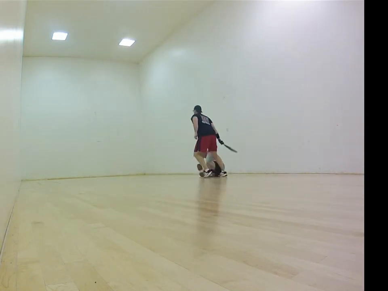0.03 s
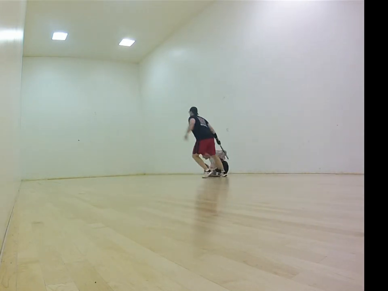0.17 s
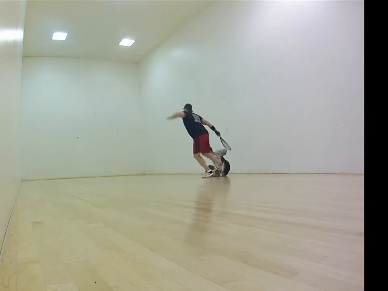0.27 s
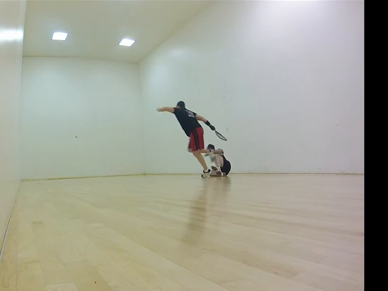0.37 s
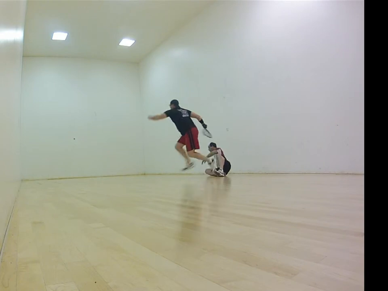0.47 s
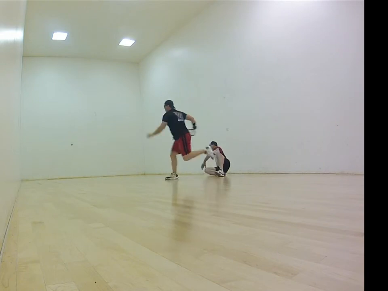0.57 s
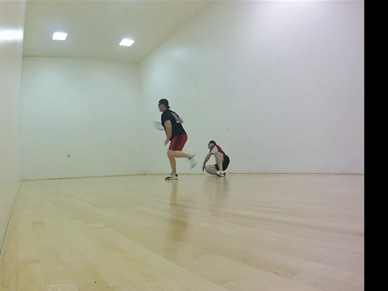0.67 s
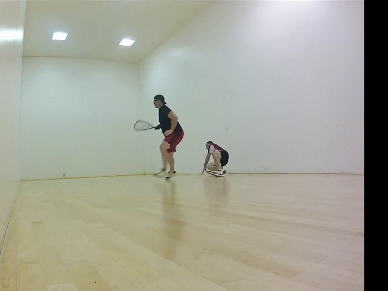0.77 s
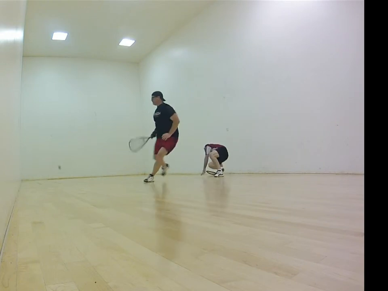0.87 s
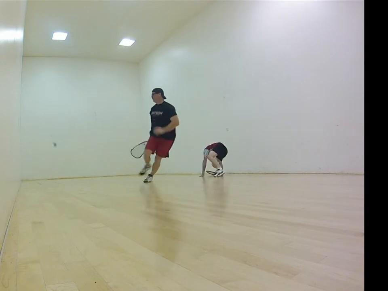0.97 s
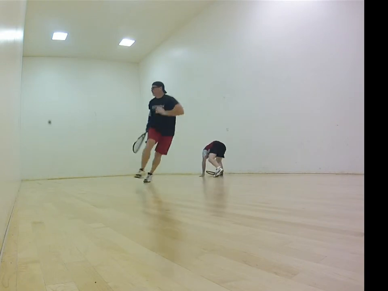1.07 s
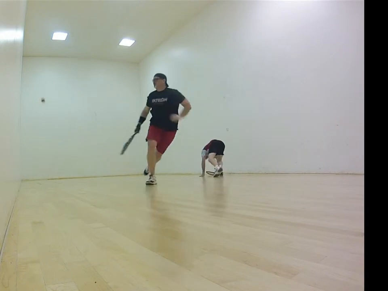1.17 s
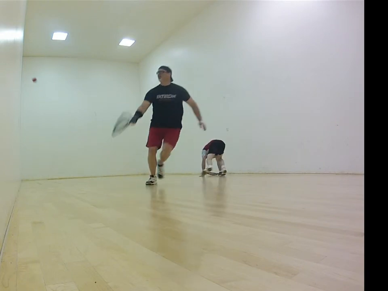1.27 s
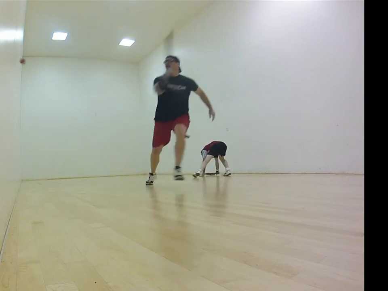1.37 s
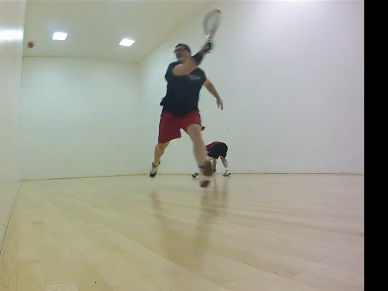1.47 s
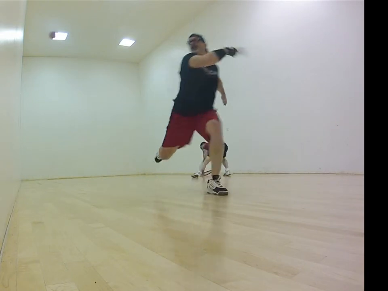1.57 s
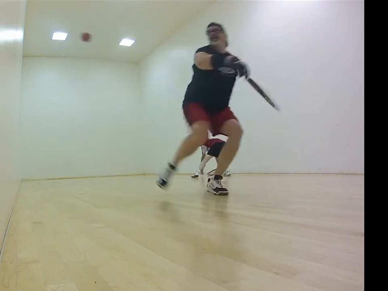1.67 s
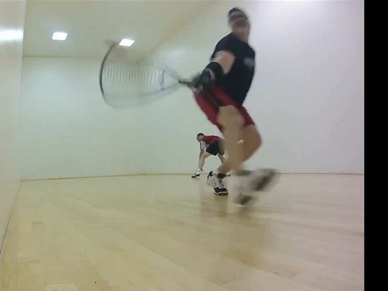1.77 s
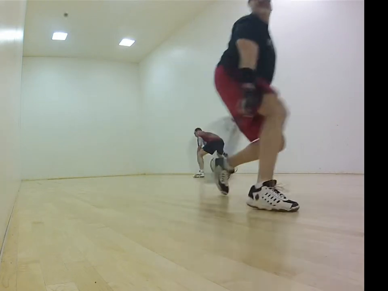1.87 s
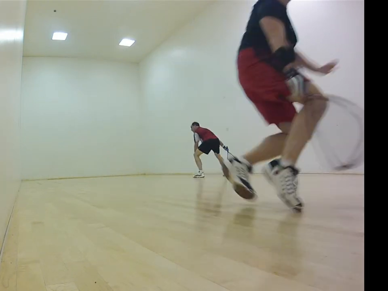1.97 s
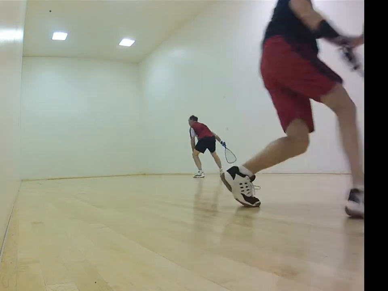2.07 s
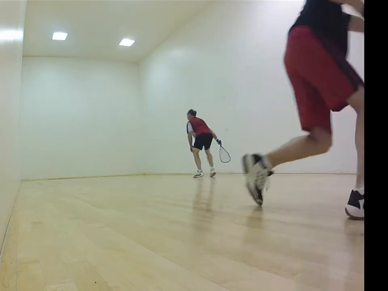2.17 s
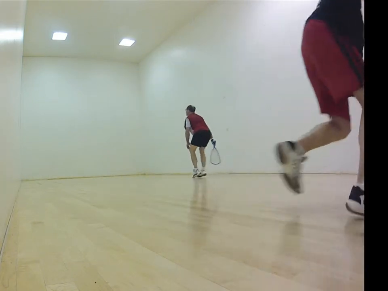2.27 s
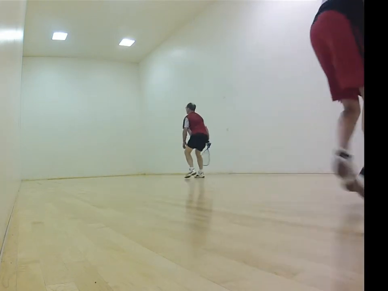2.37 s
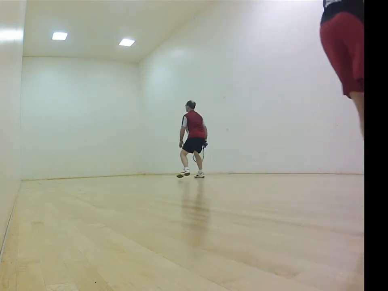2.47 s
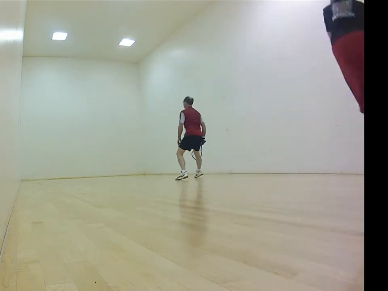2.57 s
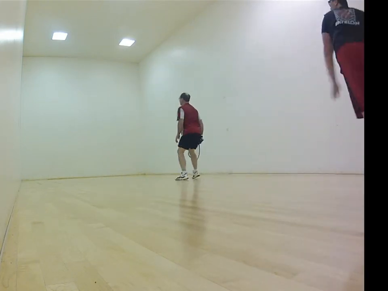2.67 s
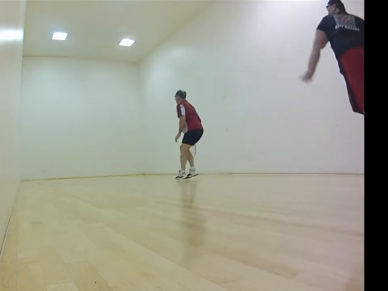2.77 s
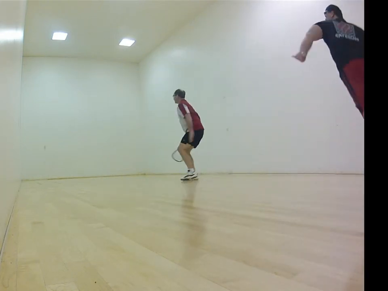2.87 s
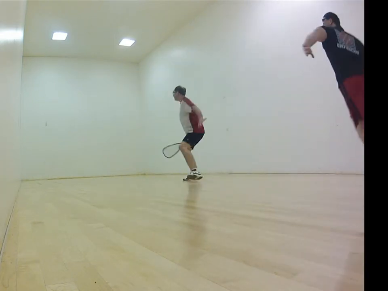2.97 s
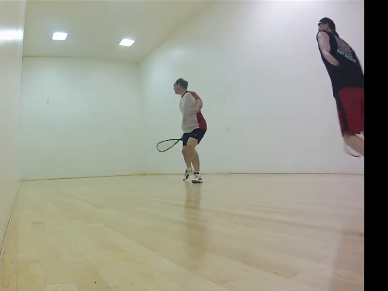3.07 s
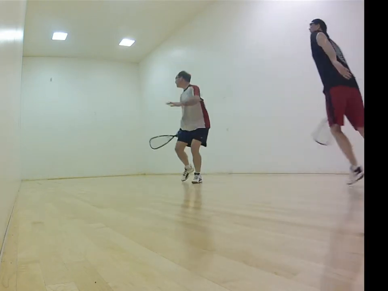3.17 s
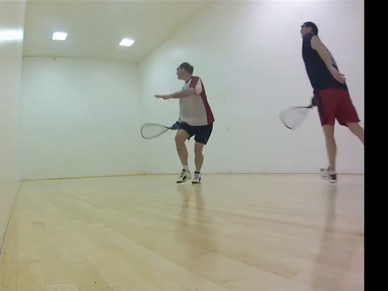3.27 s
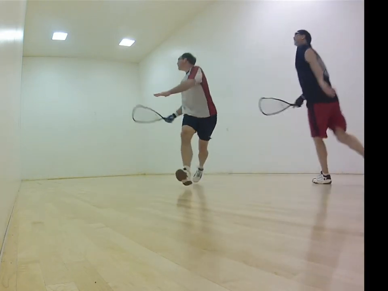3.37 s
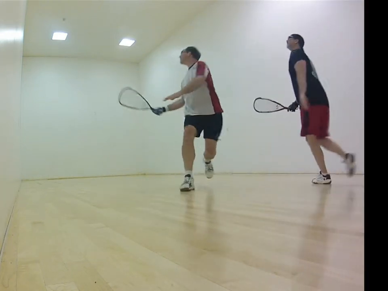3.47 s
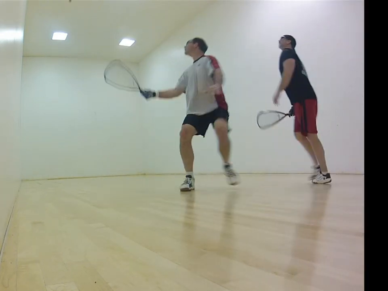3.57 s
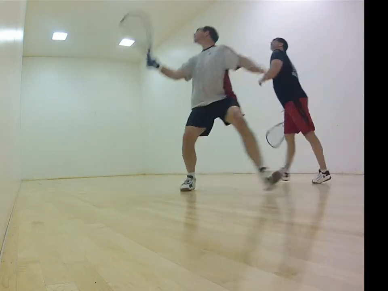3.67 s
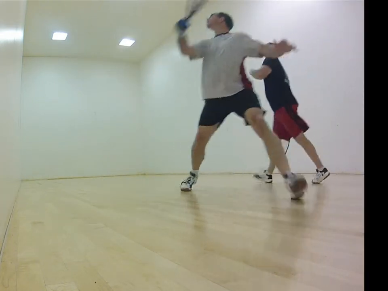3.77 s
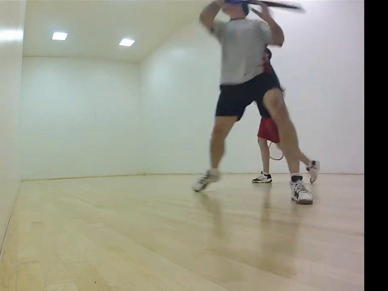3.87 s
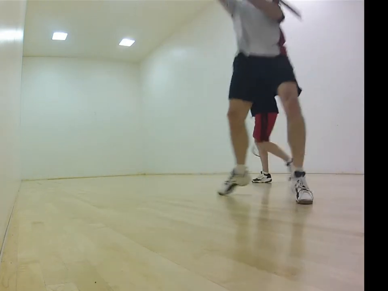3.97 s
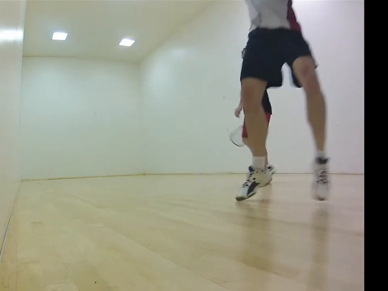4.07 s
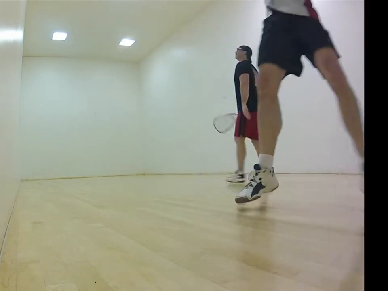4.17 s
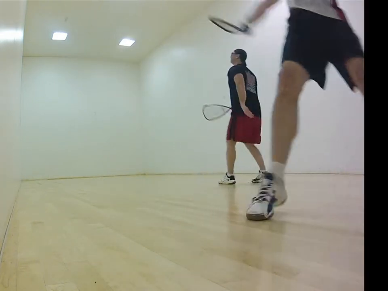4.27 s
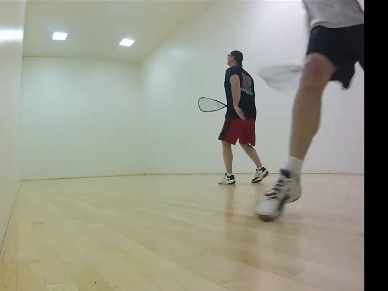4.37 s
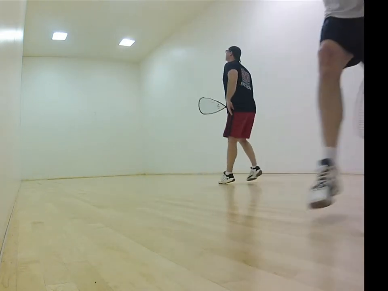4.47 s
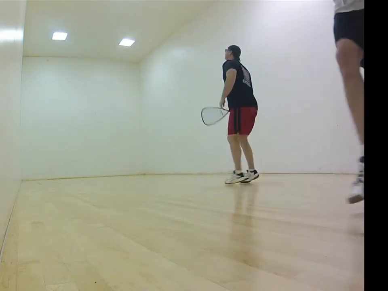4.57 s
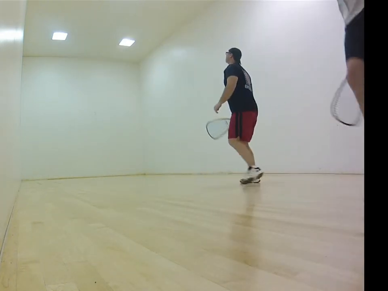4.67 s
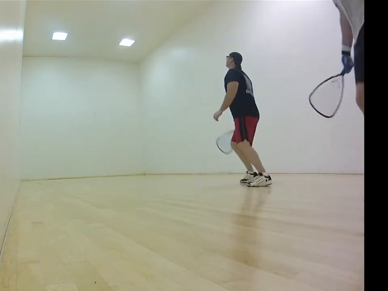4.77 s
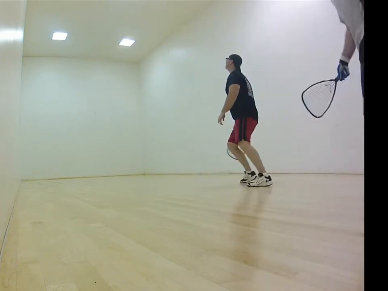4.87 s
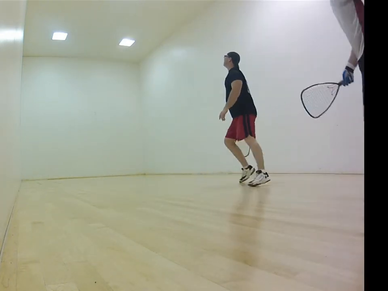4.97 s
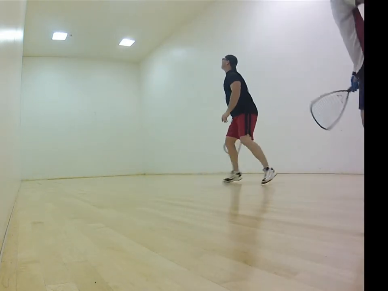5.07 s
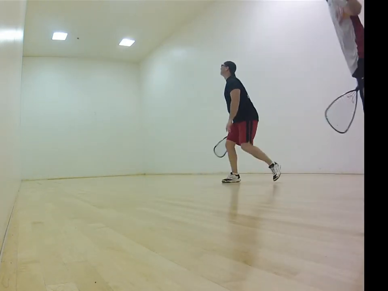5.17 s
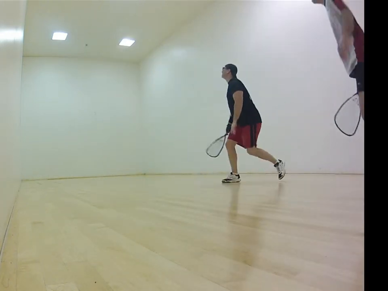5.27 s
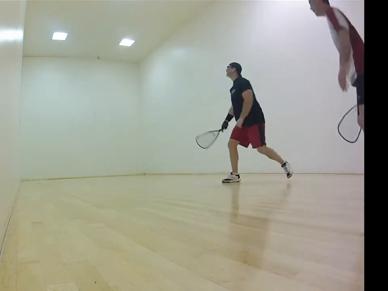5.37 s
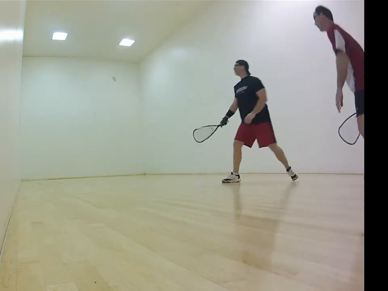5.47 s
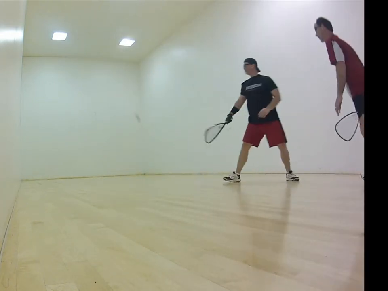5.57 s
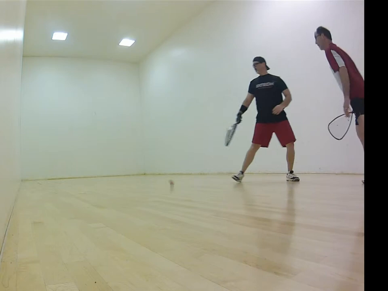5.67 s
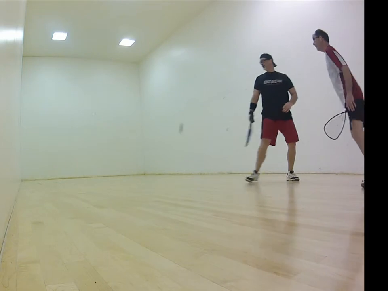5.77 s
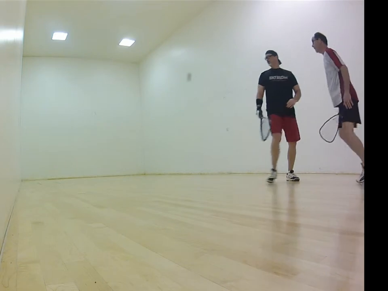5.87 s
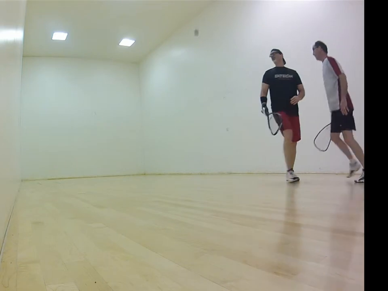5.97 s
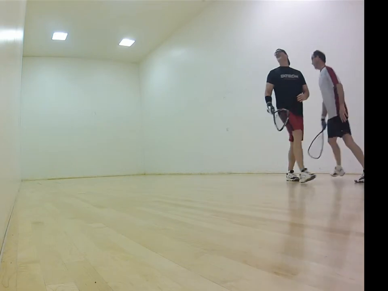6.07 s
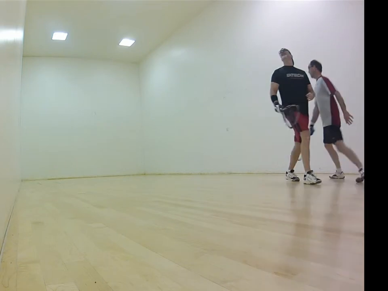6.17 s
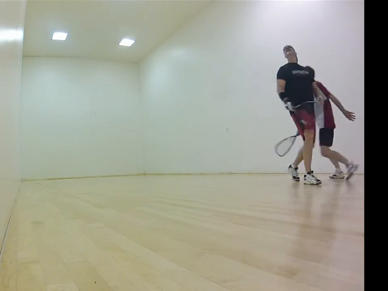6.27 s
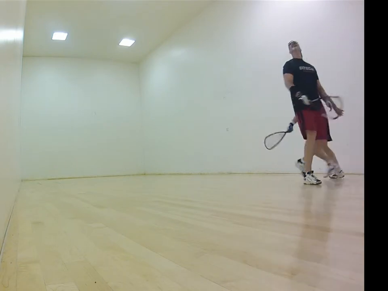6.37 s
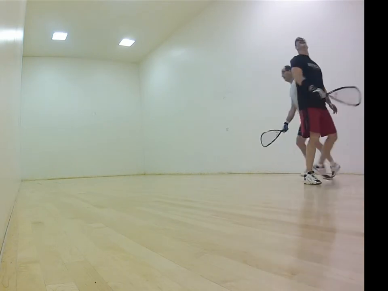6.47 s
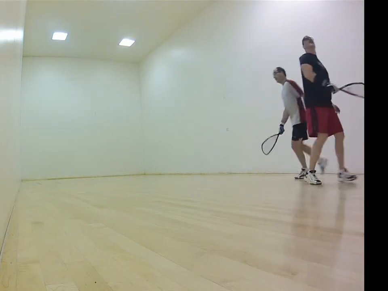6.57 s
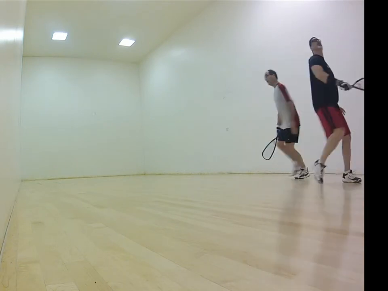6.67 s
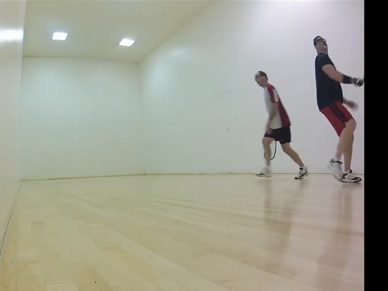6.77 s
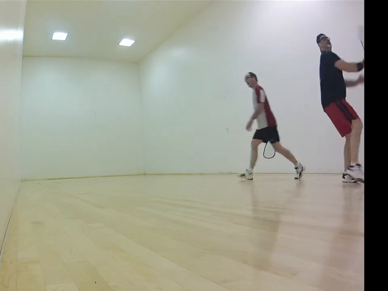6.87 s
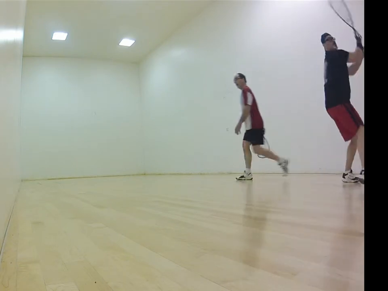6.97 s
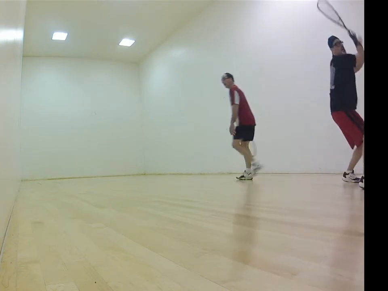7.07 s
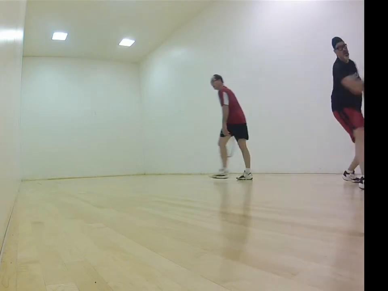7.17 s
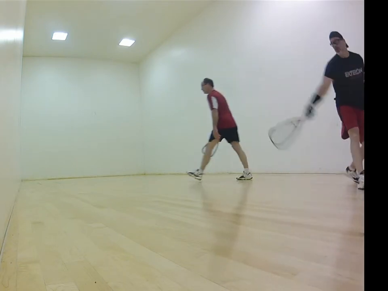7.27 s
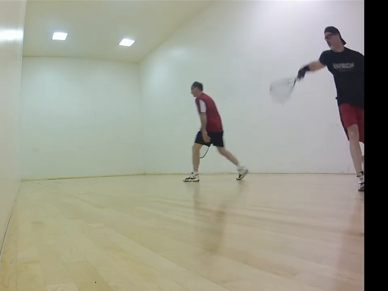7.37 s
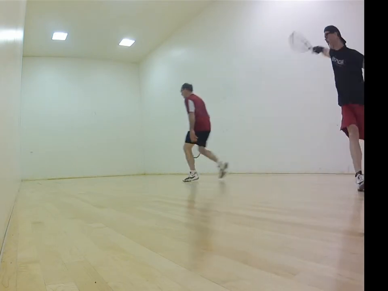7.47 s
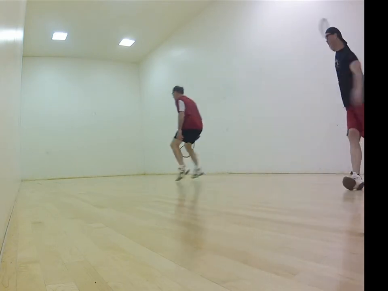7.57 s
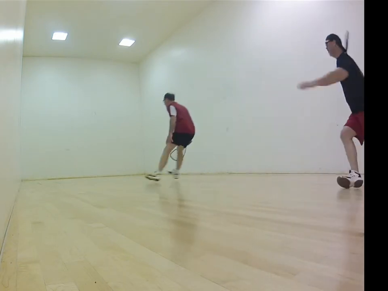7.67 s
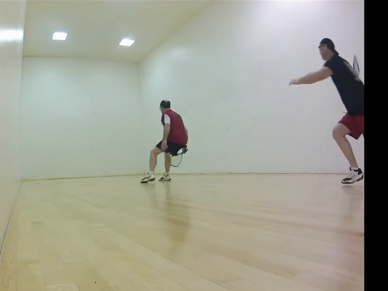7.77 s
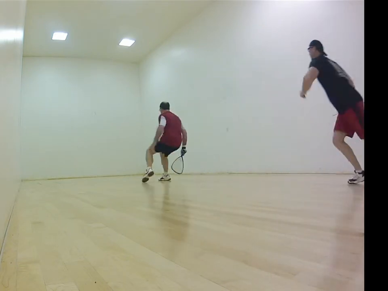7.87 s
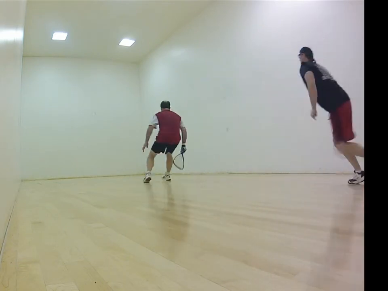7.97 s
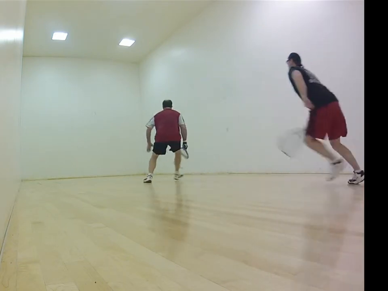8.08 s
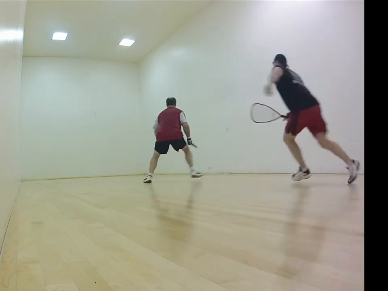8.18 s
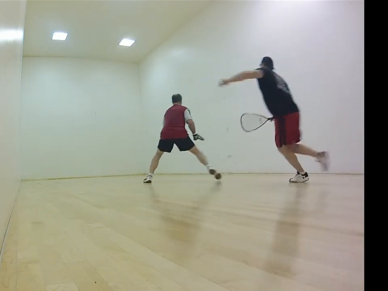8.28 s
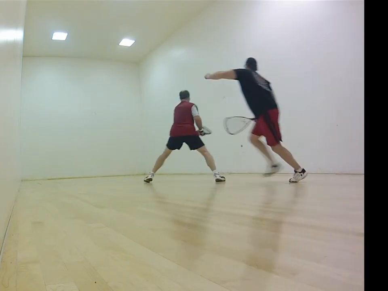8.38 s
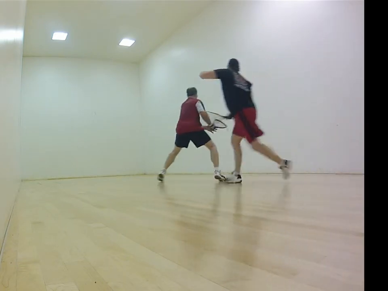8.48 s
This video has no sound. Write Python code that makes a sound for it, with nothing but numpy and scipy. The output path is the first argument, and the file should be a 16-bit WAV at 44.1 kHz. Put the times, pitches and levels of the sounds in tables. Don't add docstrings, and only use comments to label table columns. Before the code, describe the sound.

Hollow rubber ball cracks off racquets, walls and floor in a hard, echoing indoor court, with shoe squeaks and booming footfalls.

```python
import sys
import numpy as np
from scipy import signal
from scipy.fft import rfft, irfft, next_fast_len
from scipy.io import wavfile

SR = 44100
rng = np.random.default_rng(int(sys.argv[2]) if len(sys.argv) > 2 else 0)


def gain_from_db(level_db):
    decades = np.asarray(level_db, float) / 20
    return 10 ** decades


def to_wav(sig):
    pcm = np.clip(np.atleast_2d(sig), -1, 1) * 32767
    pcm = np.round(pcm).astype(np.int16)
    wavfile.write(sys.argv[1], SR, pcm.T)


N = 376605
RUN_IN = SR


def at_hz(points, hz):
    table = np.array(points)
    return np.interp(np.log(hz), np.log(table[:, 0]), table[:, 1])


def burst(hz, length_s, glide, rise):
    u = np.arange(1, int(length_s * SR)) / (length_s * SR)
    hump = np.sin(np.pi * u ** rise) ** 2
    phase = 2 * np.pi * hz * length_s * (u + glide * (u * u - u))
    tone = hump * np.sin(phase)
    return tone / np.linalg.norm(tone)


def silent_tracks():
    return np.zeros((2, N + 2 * RUN_IN))


def add(tracks, start_s, pulse, level_db, nearness_db):
    i = RUN_IN + int(start_s * SR)
    path_gains = np.array([[1], [gain_from_db(nearness_db + 10.5)]])
    tracks[:, i:i + len(pulse)] += pulse * gain_from_db(level_db) * path_gains


# start_s [s], thud_db [dB], ring_db [dB], ring_hz [Hz], nearness_db [dB]
STROKES = [
    (-.3, 7, 6, 788, 0),
    (.124, 1.5, -2.5, 798, 25),
    (1.638, -15.5, -29, 690, 28),
    (2.0, -9, -10.5, 967, 14.5),
    (2.1729, 0, -6, 880, 18),
    (4.183, -4.5, 2, 830, 21),
    (4.706, -4.5, -11, 827, 27),
    (7.329, -5.5, -1, 829, 27),
    (7.874, -8.5, -36, 870, 19),
]
# start_s [s], thud_db [dB], ring_db [dB], ring_hz [Hz], nearness_db [dB]
WALLS = [
    (2.10, -5.5, -7, 733, 19.5),
    (2.88, -14.5, -15, 885, 25),
    (5.211, -27, -36, 810, 35.5),
    (5.296, -17, -26, 791, 26),
    (5.789, -14.5, -9, 906.4, 33),
    (7.316, -35.5, -38, 650, 40),
    (7.56, -13.5, -12.5, 810, 25),
    (7.697, -1, -3.5, 814, 19),
    (7.769, -6.5, -3.5, 871.5, 22.5),
]
# start_s [s], thud_db [dB],
# ring_db [dB], ring_hz [Hz], nearness_db [dB]
GLANCES = [
    (4.728, -50, 4, 847.6, 20),
    (6.09, -55, -25.5, 893, 31),
    (7.392, -12, -2.5, 907, 20),
    (7.61, -14, -25, 800, 23.5),
    (8.06, -15, -9, 880, 15),
    (8.43, -22, -12, 796, 19),
]
# start_s [s], thud_db [dB], ring_db [dB], ring_hz [Hz], nearness_db [dB]
BOUNCES = [
    (.662, 0, -1.5, 670, 24.5),
    (1.856, -7.5, -9, 745, 28),
    (1.914, -8.5, -18.5, 907, 31.5),
    (3.869, -28.5, -39, 662, 31),
    (3.908, -12.5, -21.5, 550, 35),
]


def ball():
    contact_s, ring_s, after_ring_s = 0.00241, 0.0096, 0.04
    after_ring_db, away_db = -2, -6
    crack_s = 0.0014
    tracks = silent_tracks()

    noise = rng.standard_normal((31, 600)) * np.exp(-np.arange(600) / (crack_s * SR))
    rubber_band = signal.butter(2, [1200, 6000], "band", fs=SR, output="sos")
    slaps = iter(signal.sosfilt(rubber_band, noise))
    squash = burst(257.3, 0.0058, -0.42, 0.77)
    bounce = -burst(170, 0.0106, -0.38, 0.8)
    # blows, thud pulse, crack re thud [dB], loss of after-ring to the floor [dB]
    kinds = ((STROKES, squash, -14, 0), (WALLS, squash, -27, 0),
             (GLANCES, squash, -6, 0), (BOUNCES, bounce, -24.5, -10.5))
    for blows, thud, crack_db, damping_db in kinds:
        for (start_s, thud_db, ring_db, ring_hz, nearness_db), slap in zip(blows, slaps):
            release_s = start_s + contact_s
            air_ring = burst(ring_hz, ring_s, 0.24, 0.86)
            shell_ring = burst(0.681 * ring_hz, 0.013, 0.087, 1.0)
            after_ring = burst(ring_hz, after_ring_s, 0, 0.39)
            add(tracks, start_s, thud, thud_db, nearness_db)
            add(tracks, release_s, air_ring, ring_db, nearness_db)
            add(tracks, release_s, shell_ring, ring_db - 10, nearness_db)
            add(tracks, release_s, after_ring, ring_db + after_ring_db + damping_db, nearness_db + away_db)
            add(tracks, start_s + 0.002, slap / np.linalg.norm(slap), thud_db + crack_db, nearness_db)
    return tracks


# pitch_hz [Hz], level_db [dB]
EARLIER_SCUFFS = [
    (1200, -16),
    (4600, -14),
]
# start_s [s], pitch_hz [Hz], level_db [dB], length_s [s], nearness_db [dB]
SQUEAKS = [(.172, 1990, -24.5, 0.013, 30), (.245, 3150, -35, 0.0072, 46), (.748, 1300, -31, 0.0086, 16),
           (1.43, 2650, -29.5, 0.0029, 19), (2.176, 3196, -18.5, 0.0044, 34),
           (2.18, 4120, -17, 0.0043, 32.5), (2.18, 2490, -25, 0.012, 39), (4.32, 4180, -29, 0.0086, 32.5),
           (5.199, 2990, -24.5, 0.0047, 18), (6.71, 3910, -25.5, 0.0057, 21),
           (6.711, 2630, -33, 0.0047, 21), (6.712, 5070, -40, 0.0055, 17), (6.96, 1570, -40, 0.01, 12.5),
           (7.312, 4860, -52.5, .008, 39.5), (7.585, 2950, -28, 0.016, 24), (7.73, 4220, -33, 0.014, 24)]
# start_s [s], pitch_hz [Hz], level_db [dB], nearness_db [dB]
SCUFFS = [
    (.143, 2980, -16, 21.5),
    (.2, 1030, -16.5, 10),
    (.661, 1010, -23.5, 15),
    (1.429, 5000, -30.5, 18),
    (4.707, 3050, -24.5, 23),
    (4.735, 1680, -21, 7),
    (5.198, 5150, -32.5, 19),
    (5.791, 4030, -29, 25),
    (7.315, 3700, -43, 27),
]
# start_s [s], length_s [s], centre_hz [Hz], level_db [dB], nearness_db [dB]
DRAGS = [
    (0.153, 0.17, 3720, -13.5, 31),
    (7.293, 0.087, 4330, -36, 34),
    (7.464, 0.015, 2890, -25.5, 28.5),
    (7.56, 0.044, 4900, -28.5, 32),
]


def squeaks():
    scuff_s, glide = 0.0016, 0.025
    drag_width = 1.29
    tracks = silent_tracks()
    add(tracks, -0.15, burst(3000, 0.005, 0.01, 0.7), -26, 0)
    for pitch_hz, level_db in EARLIER_SCUFFS:
        add(tracks, -RUN_IN / SR / 4, burst(pitch_hz, scuff_s, 0, 0.59), level_db, 0)

    chance = rng.standard_normal((40, 1150))
    uneven = 1 + 0.49 * signal.lfilter([0.3], [1, -0.93], chance)
    short_slips = [(start_s, pitch_hz, level_db, scuff_s, nearness_db)
                   for start_s, pitch_hz, level_db, nearness_db in SCUFFS]
    slips = SQUEAKS + short_slips
    for (start_s, pitch_hz, level_db, length_s, nearness_db), grip in zip(slips, uneven):
        tone = burst(pitch_hz, length_s, glide, 0.67)[:len(grip)]
        add(tracks, start_s, tone * grip[:len(tone)], level_db, nearness_db)

    noise = chance.ravel()
    grit = np.sign(noise) * np.abs(noise) ** 1.4
    for start_s, length_s, centre_hz, level_db, nearness_db in DRAGS:
        edges_hz = [centre_hz / drag_width, centre_hz * drag_width]
        band = signal.butter(2, edges_hz, "band", fs=SR, output="sos")
        size = int(length_s * SR)
        stretch = np.roll(grit, int(start_s * SR))[:size]
        rasp = signal.sosfilt(band, stretch) * np.hanning(size) ** 0.5
        add(tracks, start_s, rasp / np.linalg.norm(rasp), level_db, nearness_db)
    return tracks


# frequency_hz [Hz], level_db [dB per Hz]
VENTILATION = [(18, -43), (30, -5.5), (113, 5), (545, -4.5), (900, -15.5), (1250, -44), (3050, -24),
               (4230, -27.5), (5500, -35), (7150, -110), (12100, -120)]


def ventilation():
    size = next_fast_len(N)
    hz = np.fft.rfftfreq(size, 1 / SR) + 1
    spectrum = rfft(rng.standard_normal(size)) * gain_from_db(at_hz(VENTILATION, hz))
    rush = irfft(spectrum, size)[:N]
    return gain_from_db(-24) * rush / rush.std()


# start_s [s], level_db [dB], boom_hz [Hz], length_s [s], nearness_db [dB]
STEPS = [(.684, -16, 132, 0.016, 42.5), (.712, -9.5, 154, 0.035, 35), (.77, -16.5, 170, 0.032, 30),
         (.805, -28, 170, 0.012, 14), (1.608, -25.5, 175, 0.0073, 39), (1.672, -13, 127.5, 0.048, 31.5),
         (2.123, -4.5, 106, 0.027, 21), (2.64, -6, 170, 0.016, 19), (4.716, -5.5, 232.5, .0316, 24),
         (7.707, -16, 192, .028, 37), (7.742, -18, 222, 0.02, 29), (7.95, -9.5, 140.6, .071, 27),
         (8.15, -13, 170, 0.02, 31)]
# start_s [s], level_db [dB], boom_hz [Hz], length_s [s], nearness_db [dB]
LANDINGS = [
    (1.638, -15, 125.7, 0.02, 39.5),
    (1.705, -13, 138, 0.011, 24),
    (2.295, 1.5, 141, 0.039, 24.5),
    (2.333, -7, 152, 0.0037, 31.5),
    (2.40, -7, 165.6, 0.027, 33),
    (3.54, -19, 131, 0.041, 31.5),
    (3.914, -28, 158, .019, 34),
    (4.30, -37, 120, .022, 22),
    (6.695, -32.5, 170, 0.018, 32),
    (7.01, -21, 129, 0.018, 26),
]


def steps():
    tracks = silent_tracks()
    slap = burst(2600, 0.00019, 0.084, 0.4)
    for footfalls, push_db in ((STEPS, -33), (LANDINGS, -5.5)):
        for start_s, level_db, boom_hz, length_s, nearness_db in footfalls:
            boom = burst(boom_hz, length_s, -0.25, 0.79)
            push = burst(0.534 * boom_hz, 1.1 * length_s, -0.042, 0.45)
            add(tracks, start_s, boom, level_db, nearness_db)
            add(tracks, start_s, push, level_db + push_db, nearness_db)
            add(tracks, start_s, slap, level_db - 34.5, nearness_db)
    return tracks


# frequency_hz [Hz], t60_s [s]
COURT = [(60, 4.5), (150, 2.77), (350, 2.66), (650, 3.77), (900, 4.08), (1150, 3.24), (1800, 4),
         (3000, 3.25), (5000, 2.38)]
# frequency_hz [Hz], t60_s [s]
FLOOR = [(50, 1.9), (120, 1.31), (300, 2), (2000, 1.5)]


def echoing(feed, decays):
    echoes_per_s3, first_echo_s, build_up_s = 1.5e6, 0.016, 0.0077
    far_wall_s, before_far_wall_db = 0.064, -3
    t = np.arange(1, 3 * SR + 1) / SR
    chance = np.clip(echoes_per_s3 * t ** 2 / SR, 1e-4, 1)
    arrives = (rng.random(len(t)) < chance) * (t > first_echo_s)
    echoes = rng.standard_normal(len(t)) * arrives / np.sqrt(chance)
    echoes = echoes * (1 - np.exp(-t / build_up_s))
    echoes = echoes * np.where(t < far_wall_s, gain_from_db(before_far_wall_db), 1)

    hz = np.fft.rfftfreq(len(t), 1 / SR) + 1e-9
    spectrum = rfft(echoes)
    answer = 0
    for centre_hz in 30 * 2 ** (np.arange(25) / 3):
        band = np.clip(1 - 3 * np.abs(np.log2(hz / centre_hz)), 0, 1)
        decay = gain_from_db(-60 * t / at_hz(decays, centre_hz))
        answer = answer + irfft(spectrum * band, len(t)) * decay
    return signal.oaconvolve(feed, answer)[:len(feed)]


# centre_hz [Hz], width_hz [Hz], peak_db [dB]
MICROPHONE = [(880, 1800, -2.5), (2750, 4500, 0.5), (1300, 226, 7), (4100, 940, 2.5)]


def microphone(dry):
    x = signal.sosfilt(signal.butter(1, 60, "high", fs=SR, output="sos"), dry)
    for centre_hz, width_hz, peak_db in MICROPHONE:
        resonance = signal.lfilter(*signal.iirpeak(centre_hz, centre_hz / width_hz, SR), x)
        x = x + (gain_from_db(peak_db) - 1) * resonance
    x = signal.sosfilt(signal.butter(2, 4700, fs=SR, output="sos"), x)
    return signal.sosfilt(signal.ellip(6, 1, 30, 5600, fs=SR, output="sos"), x)


# start_s [s], low_gain_db [dB], recovery_s [s]
OVERLOADS = [(0, -16, 4.4), (.2, -16, 0.74), (0.664, -14.5, 0.4), (1.861, -16.5, 0.067),
             (1.923, -13.5, 0.5), (2.179, -23, 0.37), (4.189, -26, 0.57), (4.713, -11.5, 2.7),
             (4.735, -23.5, 1.12), (5.793, -17, 0.1), (7.332, -19, 3.3), (7.36, -20.5, 0.73),
             (7.698, -11.5, 3.9), (7.78, -19, 0.58)]


def gain_control():
    full_gain_db, hold_s, drop_s = -4, 0.034, 0.0025
    t = np.arange(N) / SR
    overloads = np.array(OVERLOADS)
    latest = np.maximum(np.searchsorted(overloads[:, 0], t) - 1, 0)
    start_s, low_gain_db, recovery_s = overloads.T[:, latest]
    lost = np.exp(-np.maximum(t - start_s - hold_s, 0) / recovery_s)
    gain = gain_from_db(full_gain_db) + (gain_from_db(low_gain_db) - gain_from_db(full_gain_db)) * lost
    keep = np.exp(-1 / (drop_s * SR))
    return gain[0] + signal.lfilter([1 - keep], [1, -keep], gain - gain[0])


# frequency_hz [Hz], level_db [dB re all treble]
QUIET_BAND = [(4000, -50), (5500, -30), (10000, -33.5), (13700, -31), (15200, -43), (15500, -1)]


def thinned(x):
    frames = signal.stft(x[0], nperseg=2048)[2][:1024]
    power = (np.abs(frames) ** 2).reshape(128, 8, -1).sum(axis=1)
    hz = (np.arange(128)[:, None] + 0.5) * SR / 256
    treble = power[9:].sum(axis=0)
    loud_enough = power > treble * gain_from_db(2 * at_hz(QUIET_BAND, hz))
    kept = loud_enough | (hz < QUIET_BAND[0][0])
    gated = frames * np.repeat(kept, 8, axis=0)
    gated = np.vstack([gated, frames[:1] * 0])
    return signal.istft(gated, nperseg=2048)[1][None, :N]


def scene():
    out = 0
    for (feed, direct), decays in ((ball(), COURT), (squeaks(), COURT), (steps(), FLOOR)):
        out = out + direct + echoing(feed, decays)
    return (out[RUN_IN:RUN_IN + N] + ventilation())[None]


def roll_off(x):
    return signal.sosfilt(signal.butter(12, 16500, fs=SR, output="sos"), x)


def record(dry):
    x = np.clip(microphone(dry) * gain_control(), -1, 1)
    samples = signal.resample_poly(x, 40, 147, axis=1)
    held = np.repeat(samples, 4, axis=1)
    x = signal.resample_poly(held, 147, 160, axis=1)[:, :N]
    x = signal.sosfilt(signal.cheby2(12, 60, 16300, fs=SR, output="sos"), x)
    return roll_off(np.clip(thinned(x), -1, 1))


dry = scene()
out = record(dry)
to_wav(out)
```